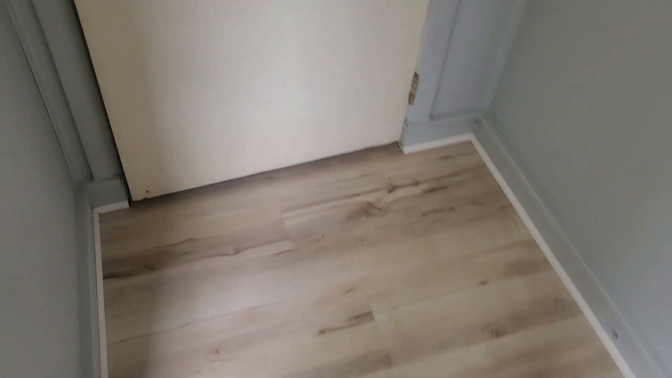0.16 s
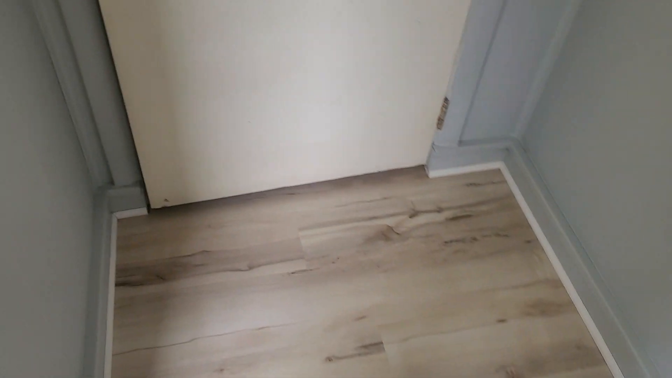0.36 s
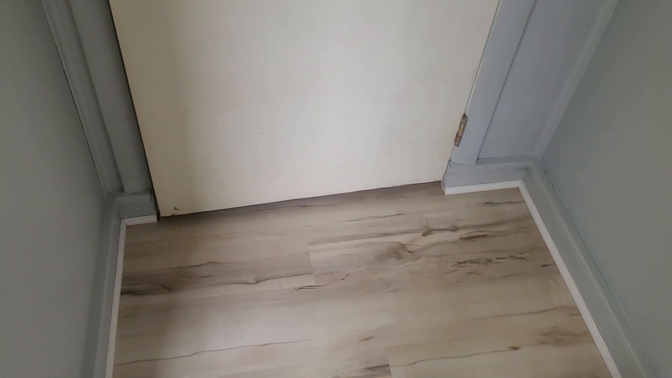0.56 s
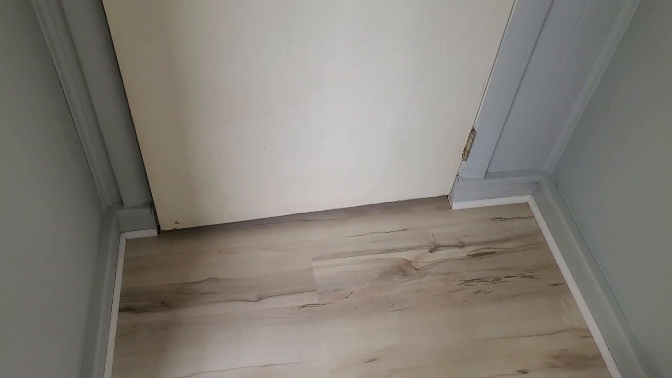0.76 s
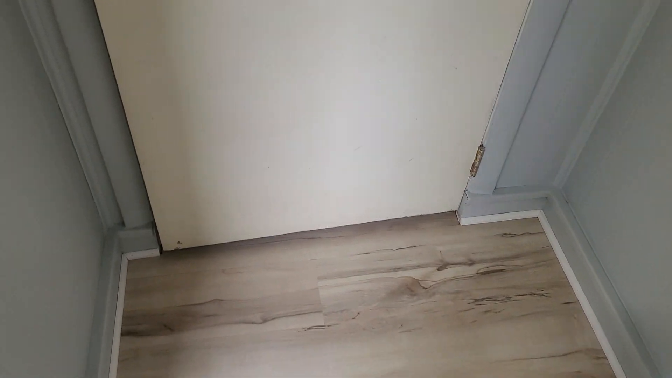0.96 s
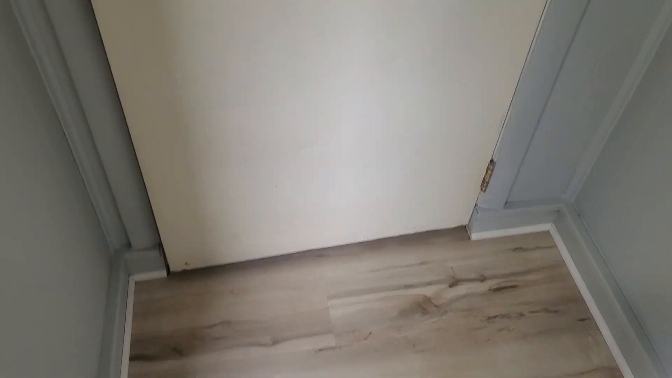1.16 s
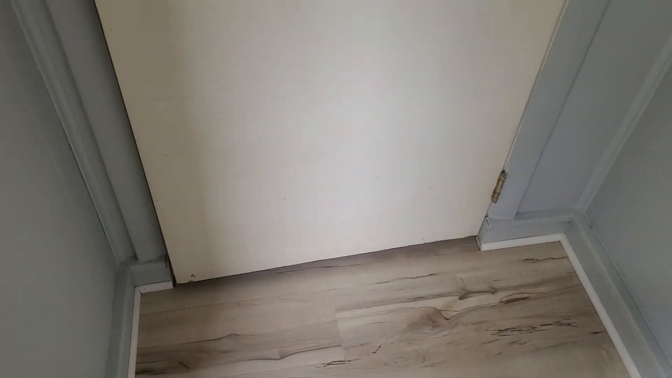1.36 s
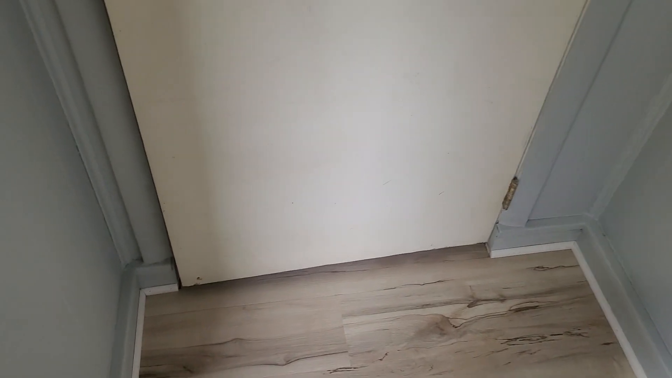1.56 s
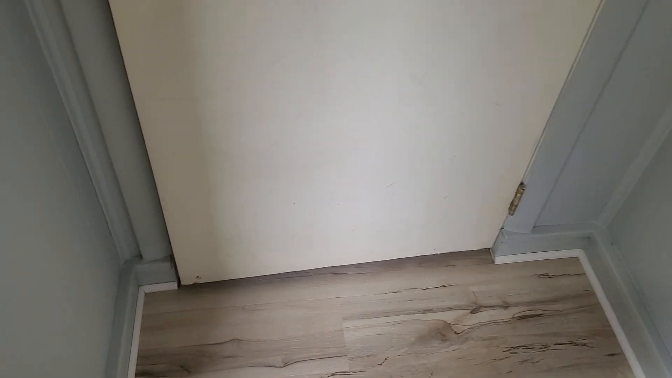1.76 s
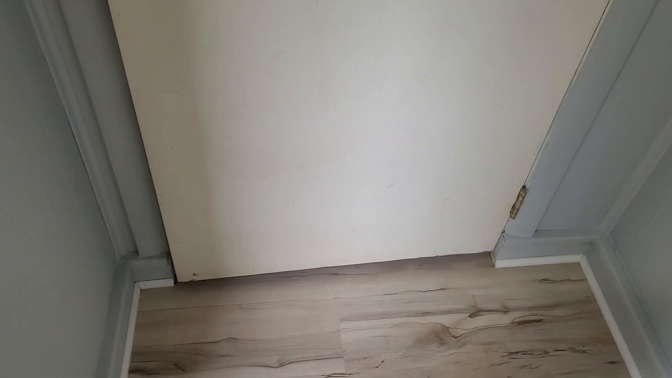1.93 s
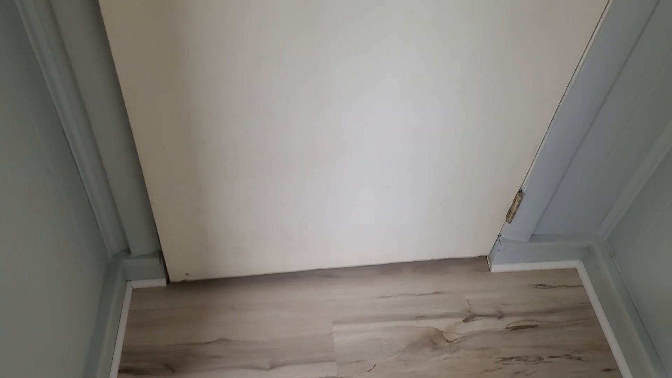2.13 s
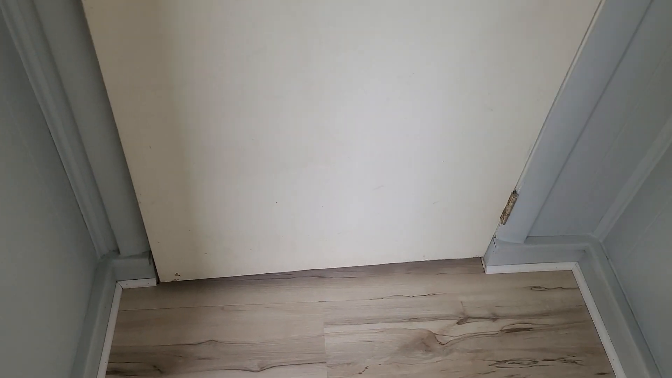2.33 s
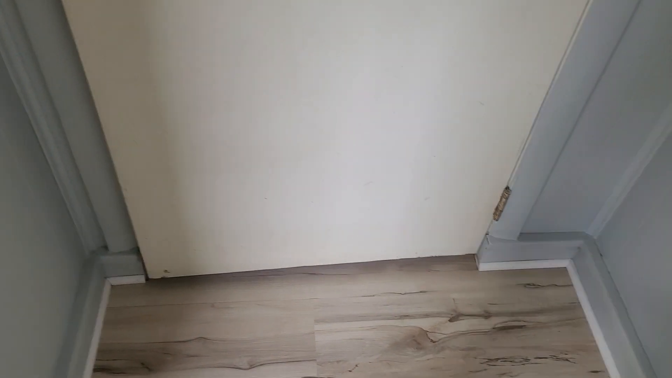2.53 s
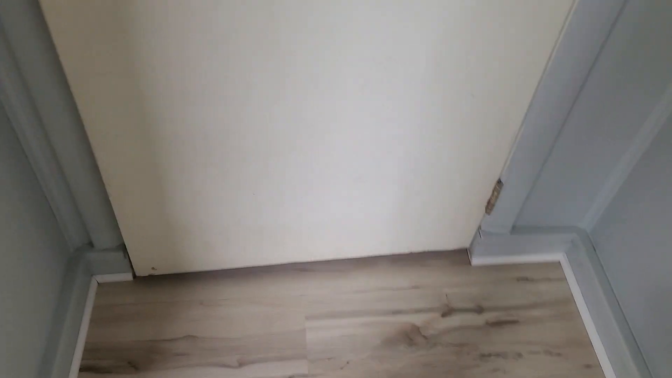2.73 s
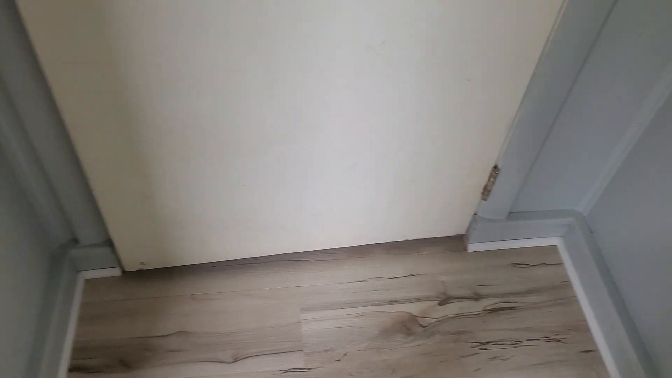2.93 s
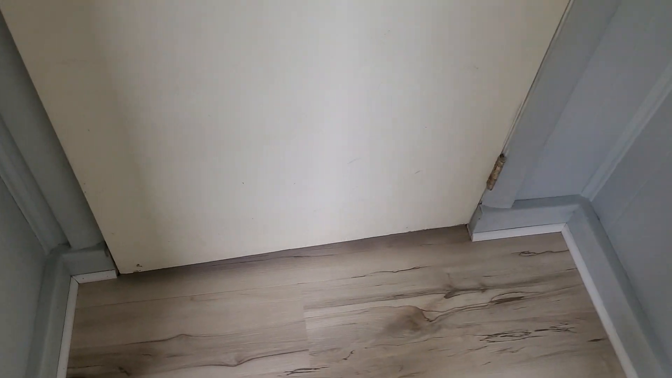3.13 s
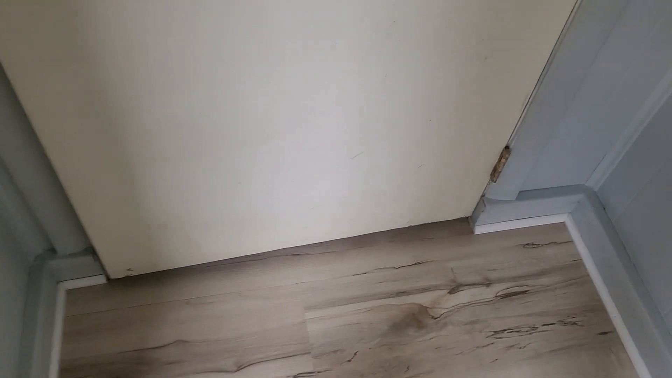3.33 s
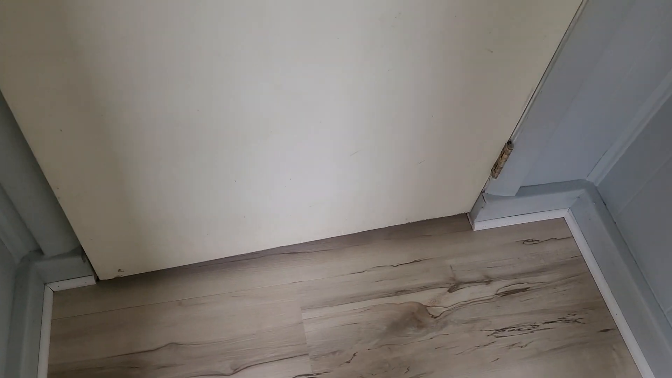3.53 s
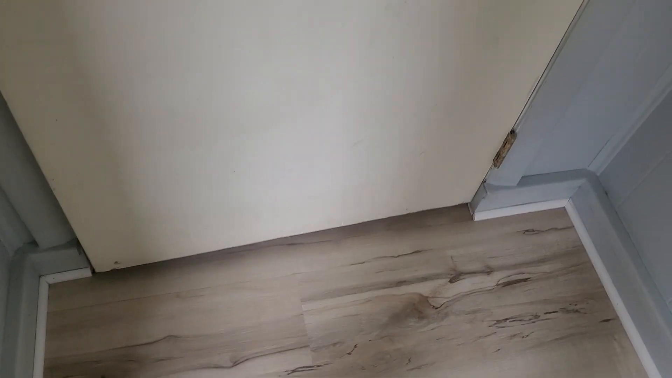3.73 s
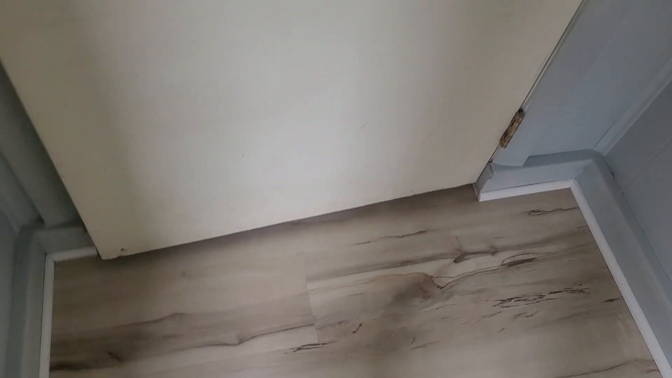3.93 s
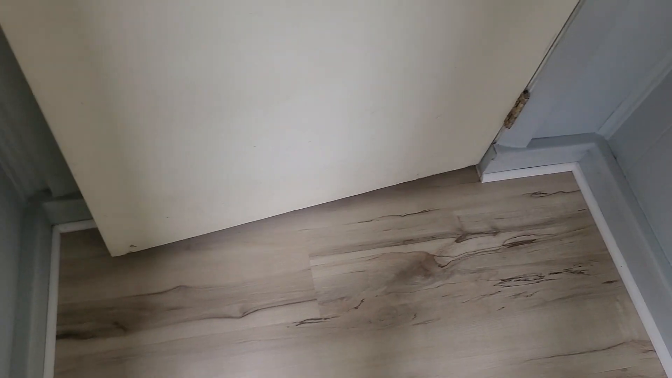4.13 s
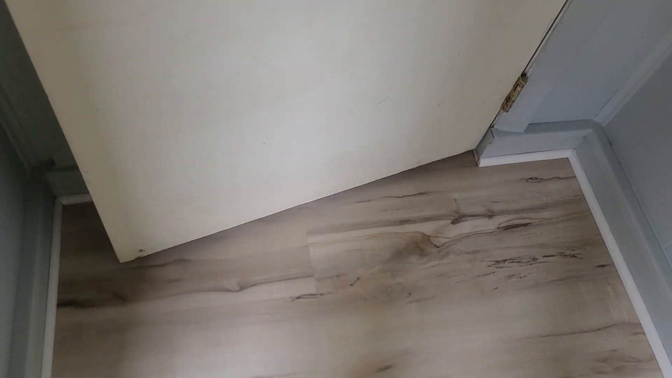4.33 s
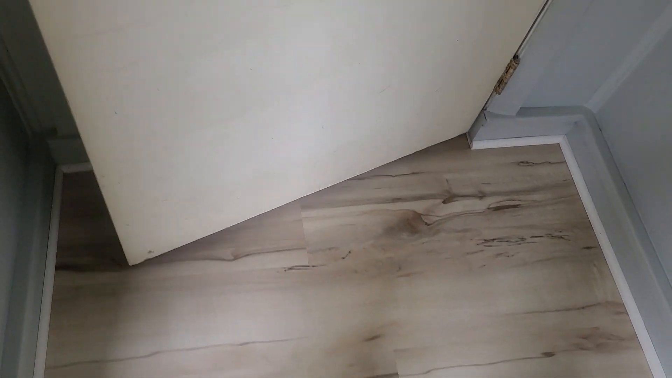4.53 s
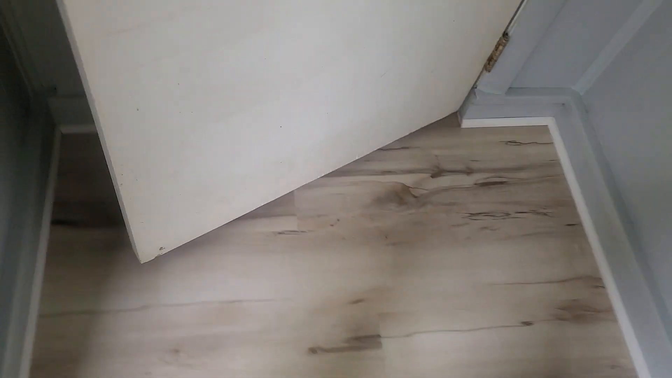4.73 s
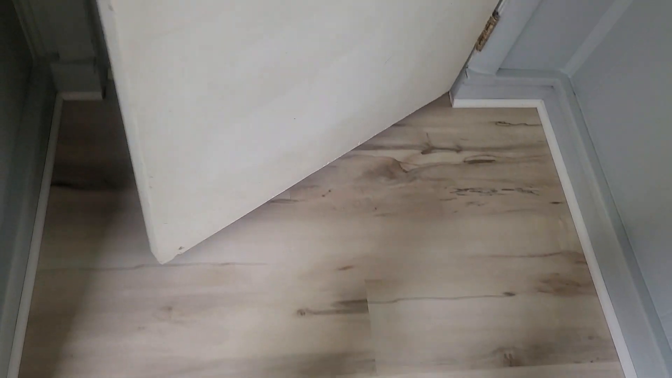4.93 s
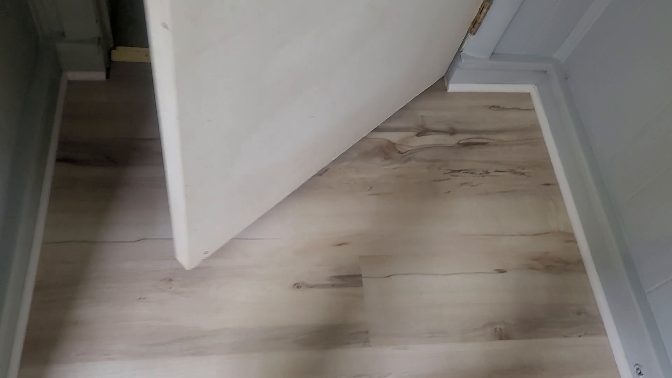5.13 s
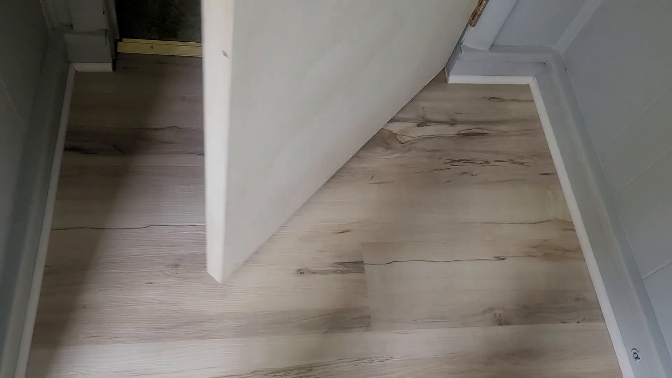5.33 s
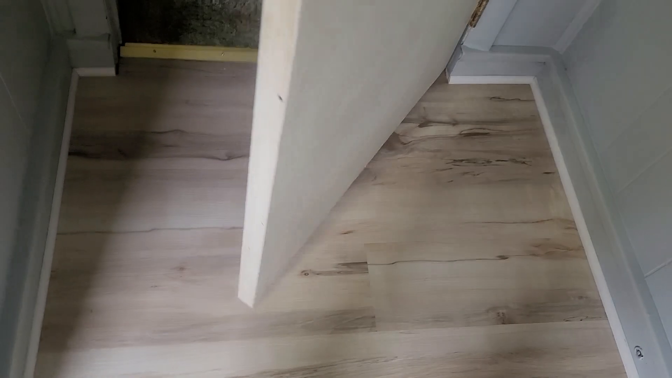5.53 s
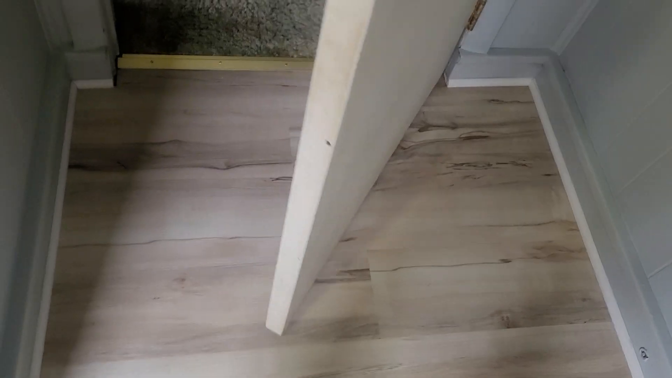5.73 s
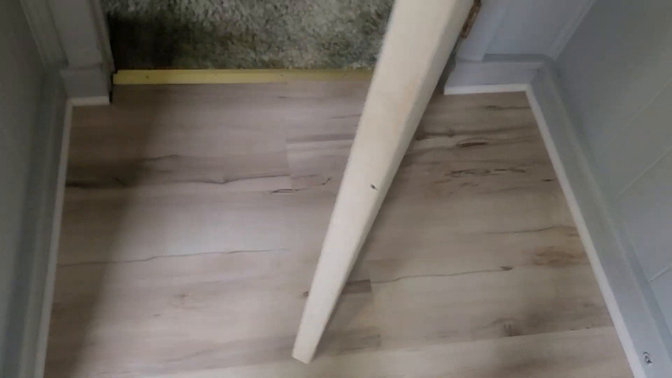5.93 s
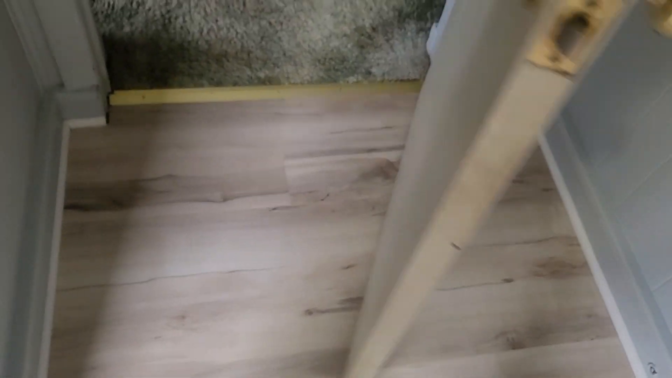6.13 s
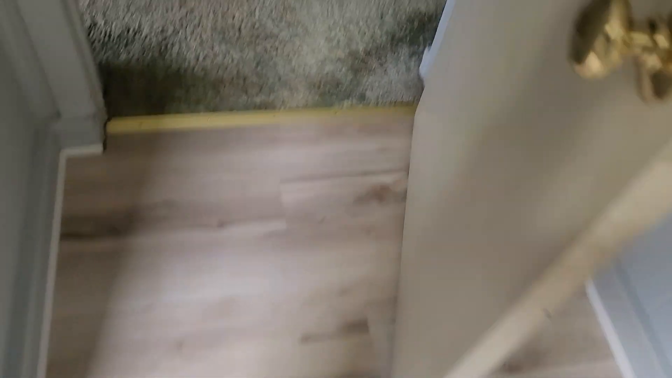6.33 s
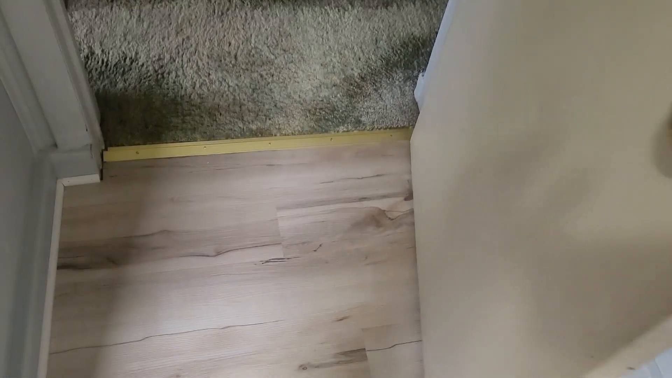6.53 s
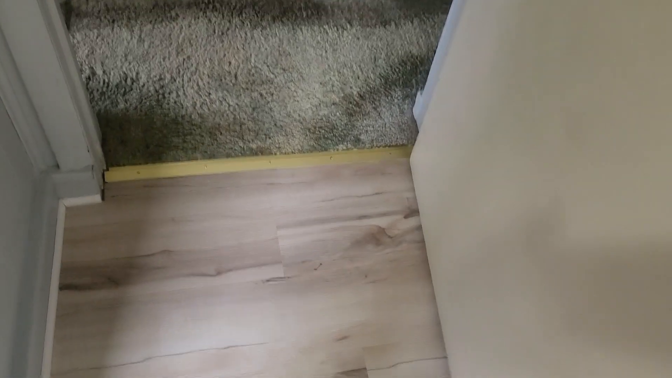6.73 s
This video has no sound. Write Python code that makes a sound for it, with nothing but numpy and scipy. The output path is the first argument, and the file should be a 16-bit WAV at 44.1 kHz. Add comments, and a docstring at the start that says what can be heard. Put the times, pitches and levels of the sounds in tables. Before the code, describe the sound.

Close in a small, hard-floored hallway, soles scuff gritty boards with small dry ticks and soft thuds. Light knocks follow as someone reaches the door. A loud double latch clack booms through the hollow panel, which faintly shivers and rubs as it swings. More knocks come, the sharpest near the end, then a low thud. A steady low mains hum and faint room rumble run throughout, picked up by a nearby handheld stereo microphone.

```python
"""Soles scuff the boards of a small hard-floored hallway as someone shuffles up to a hollow wooden door.
Then the latch and door knock and boom as it swings open, over a mains hum and the rumble of the house.
Rubs are band noise under swelling gains; blows are noise bursts, clicks and decaying modes; ticks are
band-passed clicks and thuds short low tones. Noise echoes form the hall; noise bands and tones the house."""
import sys
import numpy as np
from scipy import signal
from scipy.io import wavfile
from scipy.ndimage import uniform_filter1d

SR = 44100
rng = np.random.default_rng(int(sys.argv[2]) if len(sys.argv) > 2 else 0)


def unload_wav(signal):
    """Save mono or channel-first audio to the path in sys.argv[1] as 16-bit WAV at rate SR, clipped to [-1, 1]."""
    wavfile.write(
        sys.argv[1],
        SR,
        np.round(np.clip(np.atleast_2d(signal).T, -1, 1) * 32767).astype(np.int16),
    )


N = 299086
T = np.arange(N) / SR  # time in seconds


def undb(db):
    """Level law: decibels to an amplitude ratio."""
    return 10 ** (np.asarray(db) / 20)


def unit(x):
    """Normalization to an rms of 1."""
    return x / np.sqrt(np.mean(x ** 2))


def band(x, lo_hz, hi_hz, order=2):
    """Butterworth band-pass: a flat passband between two edges."""
    edges = [lo_hz, min(hi_hz, .45 * SR)]
    return signal.sosfilt(signal.butter(order, edges, "bandpass", fs=SR, output="sos"), x)


def noise(lo_hz, hi_hz, alike=1., size=N):
    """Partial coherence: mid and side band noise set the likeness of two channels, rms 1 overall."""
    mid, side = band(rng.standard_normal((2, size)), lo_hz, hi_hz)
    likeness = np.clip(alike, 0, 1)
    opposed = side * np.array([[1], [-1]])
    return unit(np.sqrt(1 + likeness) * mid + np.sqrt(1 - likeness) * opposed)


def walk(rate):
    """Slow random modulation: levels drawn `rate` times a second, smoothed twice; spread near 1."""
    hold = int(SR / rate)
    steps = np.repeat(rng.standard_normal(N // hold + 1), hold)
    return 1.04 * uniform_filter1d(uniform_filter1d(steps, hold), hold)[:N]


def pan(db):
    """Level difference between the ears: left over right in dB, split evenly."""
    return undb(np.array([db, -db]) / 2)


def fall(t, t60):
    """Exponential decay: 60 dB down after t60 seconds."""
    return np.exp(-np.log(1000) * t / max(t60, .002))


def swell(s, rise, hold, t60, db):
    """Envelope of a rub: an exponential rise, a hold and an exponential decay."""
    rise_db = 38.5  # climbed in each rise time; the rub starts two rise times before it is full
    up = np.minimum((T - s) / max(rise, .002), 0)
    return undb(db + rise_db * up) * (up > -2) * fall(np.maximum(T - s - max(hold, 0), 0), t60)


def lift(x, peaks):
    """Parallel resonators: each adds a band of its input to the sound."""
    return x + sum((undb(db) - 1) * band(x, hz - width / 2, hz + width / 2, order=1)
                   for hz, width, db in peaks)


def click(hz, octaves, size):
    """Impulse response of a band-pass: one hard contact, peak 1."""
    edge = 2 ** (max(octaves, .2) / 2)
    impulse = 1. * (np.arange(size) == 0)
    pulse = band(impulse, hz / edge, hz * edge, order=4)
    return pulse / np.abs(pulse).max()


def ring(modes, t, scatter_db):
    """Modal superposition: decaying sines; every blow lands elsewhere and weighs them anew."""
    weights = scatter_db * rng.standard_normal(len(modes))
    return sum(undb(db + w) * fall(t, t60) * np.sin(2 * np.pi * hz * t)
               for (hz, db, t60), w in zip(modes, weights))


def add(out, s, sound):
    """Linear superposition: mixes a sound in at s seconds."""
    i = int(s * SR)
    out[:, i:i + sound.shape[-1]] += sound[..., :N - i]


def knocks():
    """Impact excitation: each blow rattles, rings the skin and booms the panel; returns blows and boom."""
    # Knocks of latch, door and heel. Each row: start in seconds, crack level in dB, crack pitch in Hz,
    # crack width in octaves, body, snap, fizz, skin ring and boom levels in dB, rattle t60 in seconds,
    # left over right in dB.
    blow_rows = [(1.887, -36, 1210, 1.07, -50, -49, -78, -68.5, -78, 0.039, -1.5),
                 (2.166, -48.5, 1090, 1.44, -60, -77, -68, -72.5, -66.5, 0.025, -6),
                 (2.5545, -51.5, 1020, 0.29, -68, -39, -61, -87, -67, 0.018, -4),
                 (2.8643, -59, 1330, 0.59, -77, -67, -82, -76, -77, 0.047, -7),
                 (3.1881, -43.5, 1710, 0.78, -51, -55, -76, -69.5, -64, 0.038, -6),
                 (3.7323, -30, 1800, 1.96, -47, -42.5, -46.5, -53, -33.5, 0.096, -2),
                 (3.7394, -27, 1800, 1.03, -47, -50.5, -50, -47.5, -32.5, 0.074, -6.5),
                 (4.8166, -43, 1200, 1.2, -44, -70, -70, -62, -49, 0.037, -3),
                 (4.8202, -36.5, 1800, 1.5, -43, -52.5, -63, -57, -48, 0.11, -3),
                 (4.855, -44, 1700, 1.1, -59, -66, -70, -67, -50.5, 0.035, -2),
                 (5.1097, -49.5, 1360, 0.78, -58, -60, -82, -84, -65, 0.053, -11.5),
                 (5.5775, -22.5, 1490, 0.99, -34.5, -70, -78, -66, -49, 0.019, -6),
                 (5.5865, -25, 2000, 0.8, -54, -70, -78, -58.5, -55, 0.011, -6),
                 (5.9145, -54, 1580, 0.76, -48.5, -67, -70, -65, -37, 0.051, -5)]
    # Modes of the door panel. Each row: frequency in Hz, level in dB re the boom, t60 in seconds.
    panel_modes = [(111, -15.5, 0.78), (135, -7.5, 0.11), (161.7, -5, 0.56), (175.8, 3, 0.46),
                   (227.7, -15, 0.22)]
    # Modes of the door skin. Each row: frequency in Hz, level in dB re the skin ring, t60 in seconds.
    skin_modes = [(309.3, -5, 0.26), (372, -11, 0.48), (483, -0.5, 0.25), (686, -2.5, 0.22),
                  (762, -9, 0.44), (1563, 0, 0.15), (1855, 4.5, 0.1), (2000, -13, 0.065), (5130, -13, 0.12)]
    blows, boom, t = np.zeros((2, N)), np.zeros((2, N)), T[:SR * 3 // 4]
    for s, crack_db, hz, octaves, body_db, snap_db, fizz_db, skin_db, boom_db, t60, pan_db in blow_rows:
        edge = 2 ** (max(octaves, .2) / 2)
        # level in dB, band edges in Hz, multiple of the rattle t60
        parts = ((crack_db, hz / edge, hz * edge, 1), (body_db, 300, 900, 1.5),
                 (snap_db, 3500, 8000, .7), (fizz_db, 8000, 15500, .7))
        rattle = sum(undb(db) * fall(t, t60 * k) * noise(lo, hi, 0.077, size=len(t))
                     for db, lo, hi, k in parts)
        rattle = rattle * np.minimum(t / 0.0035, 1)
        # loose joints make the ring of the skin rough
        roughness = 1 + 1.92 * noise(6.9, 52, 0.65, size=len(t))
        skin = undb(skin_db) * ring(skin_modes, t, scatter_db=2.0) * roughness
        contact = undb(crack_db - 0.5) * click(hz, octaves, size=len(t))
        add(blows, s, (contact + rattle + skin) * pan(pan_db)[:, None])
        panel = ring(panel_modes, t, scatter_db=1.0) * np.minimum(t / 0.014, 1)
        add(boom, s, undb(boom_db) * panel)
    return blows, boom


def scuffs():
    """Sliding friction: grit under a sole is dense noise in the sole's resonances, whose grip flutters."""
    # Soles sliding on the boards. Each row: full at in seconds, rise, hold and t60 in seconds,
    # level in dB, dull and hiss shares in dB, left over right in dB.
    rub_rows = [(0.0, 0.0034, 0.0083, 0.11, -52.5, -16, -19, -3),
                (0.036, 0.02, 0.058, 0.45, -67, -3, -18, -2.5),
                (0.352, 0.36, 0.018, 0.31, -67, -5.5, -9.5, -1),
                (0.464, 0.05, 0.0092, 0.27, -70, -4, 3, -5), (0.713, 0.017, 0.041, 0.2, -43, -23, -12, -2),
                (0.792, 0.11, 0.012, 0.26, -37, -25.5, -8.5, -3),
                (0.909, 0.013, 0.004, 0.063, -47.5, -23, -7.5, 0), (1.3, 0.12, 0.03, 0.2, -67, -7, 6, -3),
                (1.633, 0.019, 0.023, 0.15, -60, -10, -14, 0),
                (1.667, 0.058, 0.019, 0.2, -48, -18, -10.5, -2),
                (2.156, 0.04, 0.02, 0.12, -86.5, -10, 7, 17), (2.046, 0.079, 0.02, 0.18, -88, -10, 11, 23),
                (2.513, 0.06, 0.035, 0.1, -68.5, -9, 0.5, -7),
                (2.556, 0.0035, 0.0022, 0.033, -53.5, -5.5, 7, -6.5),
                (2.843, 0.17, 0.04, 0.65, -72, -6, -8, -4), (3.666, 0.07, 0.06, 0.1, -69.5, -17, -5.5, -5),
                (4.903, 0.0086, 0.004, 0.05, -75, -10, 1, 0),
                (5.04, 0.0063, 0.0035, 0.089, -61, -25, -7, -7.5),
                (5.123, 0.09, 0.005, 0.14, -58, -3.5, -25, -0.5),
                (5.146, 0.087, 0.0087, 0.093, -65.5, -8, 4, -8),
                (5.352, 0.015, 0.081, 0.13, -52, -18, -7.5, -6),
                (5.684, 0.034, 0.018, 0.11, -64, 4, -2.5, -5), (6.133, 0.096, 0.034, 0.12, -70, -9, 0, -6)]
    # Sole resonances. Each row: frequency in Hz, width in Hz, lift in dB.
    sole_peaks = [(1400, 170, 5.5), (1780, 360, 10), (2250, 260, 4.5), (2660, 230, 8), (3000, 230, 8.5)]
    grip = undb(0.5 * walk(90))
    rasp = unit(lift(noise(1033, 5470, 0.075), sole_peaks)) * undb(2.0 * walk(300))
    dull, hiss, out = noise(396, 960, 1.0), noise(2140, 13200, 0.02), 0
    for *shape, dull_db, hiss_db, pan_db in rub_rows:
        rub = (rasp + undb(dull_db) * dull) * pan(pan_db)[:, None]
        # the hiss scatters off the walls and leans less to one side
        rub = rub + undb(hiss_db) * hiss * pan(0.48 * pan_db)[:, None]
        out = out + swell(*shape) * rub
    return grip * out


def swing():
    """Amplitude modulation: the door rubs on its hinges in lumpy bursts, each with a rough pitch."""
    # The swinging door. Each row: full at in seconds, rise, hold and t60 in seconds, level in dB,
    # pitch in Hz, dull and bright shares in dB.
    burst_rows = [(4.198, 0.089, 0.047, 0.28, -70, 698, 4.5, -8),
                  (4.345, 0.093, 0.047, 0.4, -69.5, 687, 8, -18),
                  (4.694, 0.061, 0.084, 0.1, -71, 744, -9, -20)]
    rough, dull, bright, out = noise(5.2, 78, .6), noise(310, 790, 0.43), noise(1200, 2500, .4), 0
    for *shape, hz, dull_db, bright_db in burst_rows:
        creak = rough * np.sqrt(2) * np.sin(2 * np.pi * hz * T)
        out = out + swell(*shape) * (creak + undb(dull_db) * dull + undb(bright_db) * bright)
    lumps = undb(3.0 * walk(60))
    return lumps * out


def panel_hum():
    """Resonant vibration: the moving door panel shivers, as noise in a narrow band."""
    # The panel hums on its main mode. Each row: full at in seconds, rise, hold and t60 in seconds,
    # level in dB.
    shiver_rows = [(4.135, 0.15, 0.12, 0.4, -66), (4.414, 0.17, 0.02, 0.3, -58.5),
                   (4.576, 0.1, 0.11, 0.65, -65)]
    return sum(swell(*row) for row in shiver_rows) * noise(155, 189, 0.98)


def ticks_and_thuds():
    """Contact stiffness: a tick is a sharp band click, a thud a soft low push; the boards rumble beneath."""
    # Small dry ticks. Each row: start in seconds, peak in dB, pitch in Hz, width in octaves,
    # left over right in dB.
    tick_rows = [(0.5447, -50.5, 1400, 3, 16), (0.909, -41, 1690, 0.64, 6), (1.064, -61, 3500, 2.9, 8),
                 (1.0798, -52.5, 3000, 1.4, 12.5), (1.1024, -53, 2140, 1.3, 22),
                 (1.119, -51, 2290, 1.7, 21), (1.1378, -46, 2440, 1.2, 12), (1.21, -49, 4000, 2, 12),
                 (1.846, -60, 9000, 1.5, 0), (2.484, -54, 6460, 1.3, 12), (2.512, -55, 6000, 2.2, -4),
                 (5.8247, -69.5, 4900, 1.6, -4)]
    # Soft low thuds, some of them the short bass push under a knock. Each row: start in seconds,
    # level in dB, pitch in Hz, t60 in seconds.
    thud_rows = [(0.054, -45, 222, 0.048), (0.95, -35, 235, 0.034), (1.359, -45, 500, 0.02),
                 (1.69, -58, 350, 0.014), (1.753, -50, 450, .015), (1.767, -55, 400, .015),
                 (1.95, -54, 200, 0.026), (2.06, -39, 195, 0.021), (4.948, -67, 180, 0.032),
                 (5.583, -33.5, 123, 0.047), (5.913, -29.5, 135, 0.12)]
    # The boards rumble under shifting weight. Each row: full at in seconds, rise, hold and t60
    # in seconds, level in dB.
    board_rows = [(0.053, 0.13, 0.01, 0.28, -52.5), (0.941, 0.039, 0.004, 0.38, -52.5),
                  (5.58, 0.022, 0.012, 0.31, -44)]
    ticks, thuds, t = np.zeros((2, N)), np.zeros((2, N)), T[:SR // 10]
    for s, db, hz, octaves, pan_db in tick_rows:
        add(ticks, s, undb(db) * click(hz, octaves, size=len(t)) * pan(pan_db)[:, None])
    for s, db, hz, t60 in thud_rows:
        push = fall(t, t60) * np.minimum(t / 0.0044, 1)
        add(thuds, s, undb(db) * push * np.sin(2 * np.pi * hz * t))
    rumble = sum(swell(*row) for row in board_rows) * noise(160, 520, 0.79)
    return ticks, thuds + rumble


def hall(dry):
    """Reverberation by convolution: dense echoes of a narrow hallway, each band with its own decay."""
    # Echo bands. Each row: low and high edge in Hz, t60 in seconds, relative level in dB (before a
    # bandwidth weight), likeness at both ports from 0 to 1.
    echo_bands = [(120, 450, 0.42, 2.5, 0.93), (500, 1600, 0.29, 2.5, 0.73), (1400, 4540, 0.35, 1, 0),
                  (3500, 7700, 0.33, 4, 0), (8000, 42000, 0.42, -12.5, 0.33)]
    t = T[:SR // 2]
    tail = sum(undb(db) * np.sqrt(hi - lo) * fall(t, t60) * noise(lo, hi, alike, size=len(t))
               for lo, hi, t60, db, alike in echo_bands)
    tail = tail * np.minimum(t / 0.0038, 1)
    tail = tail / np.sqrt(np.sum(tail ** 2, axis=1, keepdims=True))  # unit energy at each port
    return undb(-3.5) * signal.fftconvolve(dry, tail, axes=1)[:, :N]


def house():
    """Broadband and tonal background: flickering quarter-octave noise, a wavering hum, a faint whine."""
    # Spectrum of air and rumble. Each row: frequency in Hz, relative density in dB per Hz.
    spectrum = [(24, -13), (41, -7), (58, -17.5), (78, -10), (110, -33.5), (202, -30), (374, -35),
                (1100, -39), (1830, -37.5), (4600, -52.5), (8400, -60), (9600, -66.5), (12500, -60),
                (15800, -68)]
    # Slow swell of the airy background noise, full above 400 Hz and fading toward the bass.
    # Each row: time in seconds, level in dB; only its departure from the mean acts.
    swell_points = [(0.0, -74), (0.7, -73), (0.89, -65.5), (1.3, -72), (3.87, -69.5), (4.02, -73.5),
                    (5.46, -70), (5.51, -70), (6.29, -73.5), (6.78, -72.5)]
    # Mains hum. Each row: time in seconds, rms level in dB.
    hum_points = [(0.0, -53.5), (1.05, -54), (1.5, -48), (2.2, -46), (2.28, -51.5), (2.6, -52.5),
                  (2.75, -45.5), (2.95, -50.5), (3.5, -48.5), (4.68, -47), (4.92, -51), (5.5, -50.5),
                  (6.3, -47), (6.78, -50.5)]
    # Electric whine. Each row: time in seconds, peak level in dB before it wavers.
    whine_points = [(0, -95), (.6, -85), (2.6, -88), (3.6, -88), (4.2, -99), (5.3, -97), (6.78, -92.5)]
    air, (hz_points, db_points) = 0, np.transpose(spectrum)
    swell_db = np.interp(T, *np.transpose(swell_points))
    for hz in 22 * 2 ** np.arange(0, 9.75, 1 / 4):
        density_db = np.interp(np.log(hz), np.log(hz_points), db_points)
        flicker_db = (2.2 if hz < 300 else .9) * walk(2.91)
        db = density_db + 10 * np.log10(hz) + flicker_db
        db = db + (swell_db - swell_db.mean()) * min(hz / 400, 1)
        # the deeper the band, the more alike at both ports
        air = air + undb(db) * noise(hz / 2 ** (1 / 8), hz * 2 ** (1 / 8), min(1.1 - hz / 600, .94))
    hum_hz, lag_s = 60.02, 0.00085
    arrival = T - lag_s * np.array([[1], [0]])  # the hum reaches the left port later
    hum = np.sqrt(2) * undb(np.interp(T, *np.transpose(hum_points))) * np.sin(2 * np.pi * hum_hz * arrival)
    hum = hum + undb(-62) * noise(55.2, 68.6, 0.68)  # a rumble that beats against it
    whine_db = np.interp(T, *np.transpose(whine_points)) + 3.2 * walk(5.2)
    whine = undb(whine_db) * np.sin(2 * np.pi * 8000 * T)
    return (undb(-56.5) * unit(air) + hum + whine) * pan(-2.1)[:, None]


def scene():
    """Superposition of direct sound, echoes, low booms and background."""
    blows, boom = knocks()
    ticks, thuds = ticks_and_thuds()
    near = blows + scuffs() + swing()
    # ticks are close to the ports, so the walls return less of them
    echoes = hall(near + undb(-5.5) * ticks)
    # bass reaches both ports nearly alike
    low = (boom + panel_hum()) * pan(1.0)[:, None] + thuds * pan(-2.4)[:, None]
    return near + ticks + echoes + low + house()


def record(dry):
    """Port resonance and band limiting: the ports lift two bands; the recorder cuts the top."""
    # Microphone port resonances. Each row: frequency in Hz, width in Hz, lift in dB.
    port_peaks = [(1800, 960, 2), (6660, 970, 7)]
    top_hz = 15800
    wet = lift(dry, port_peaks)
    return signal.sosfilt(signal.ellip(14, .2, 80, top_hz, fs=SR, output="sos"), wet)


dry = scene()
out = record(dry)
unload_wav(out)
```